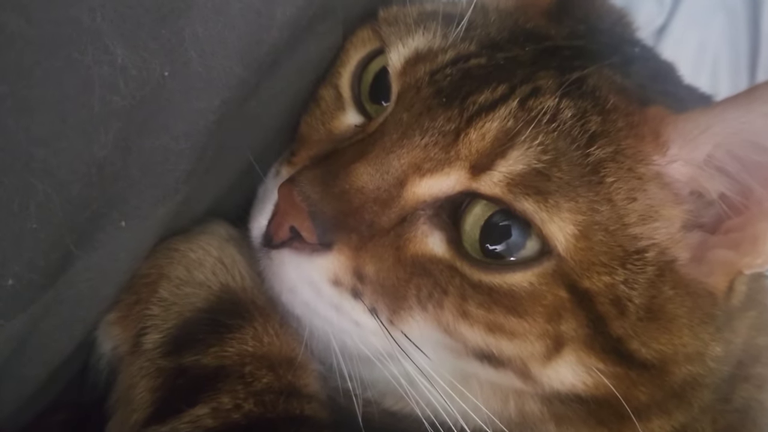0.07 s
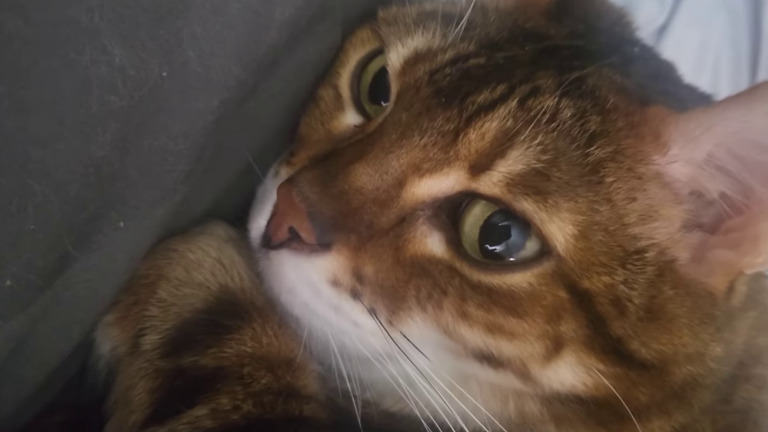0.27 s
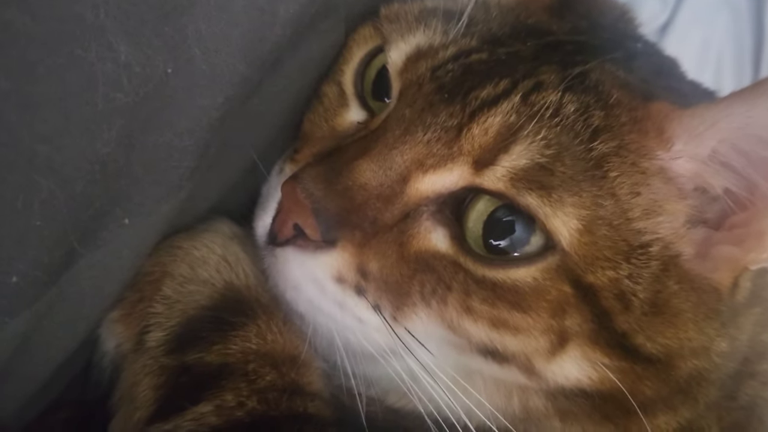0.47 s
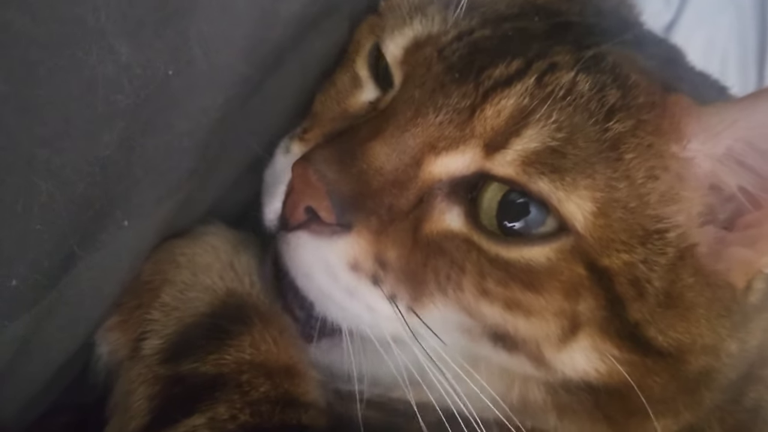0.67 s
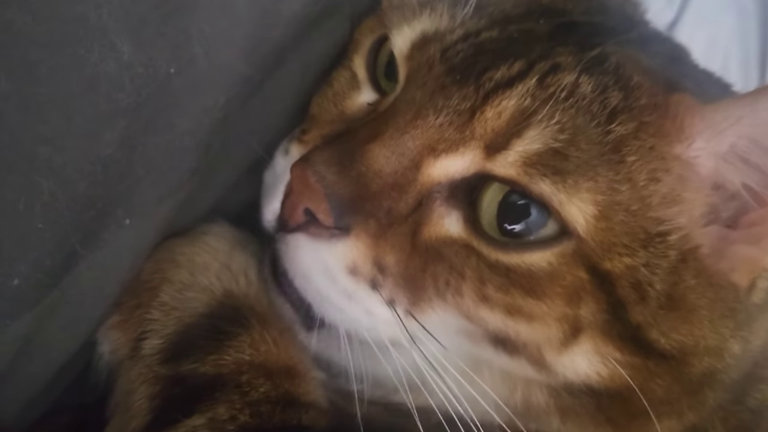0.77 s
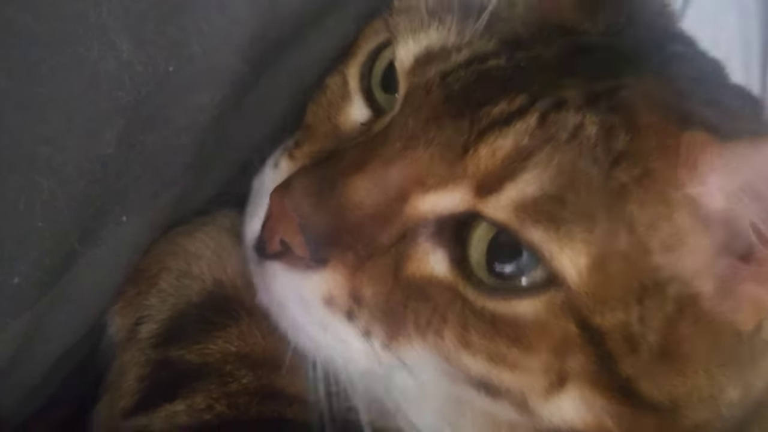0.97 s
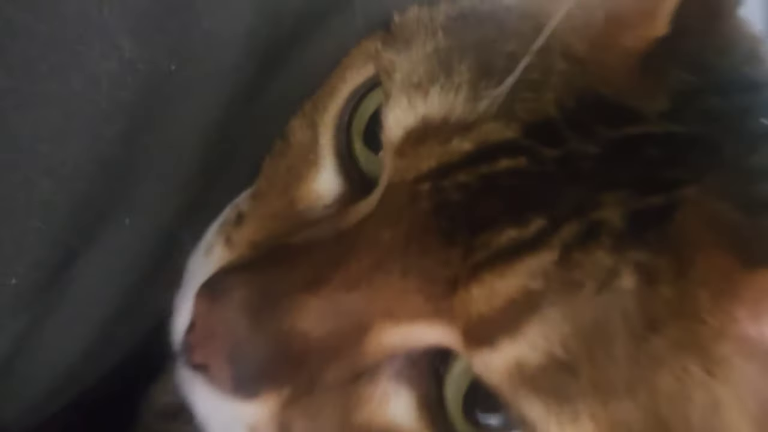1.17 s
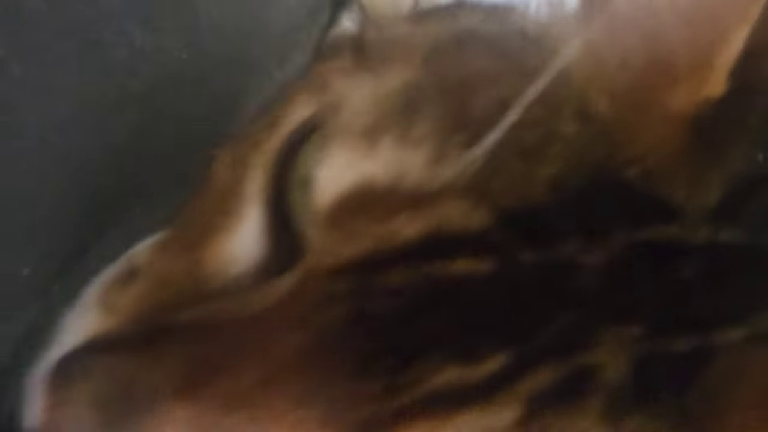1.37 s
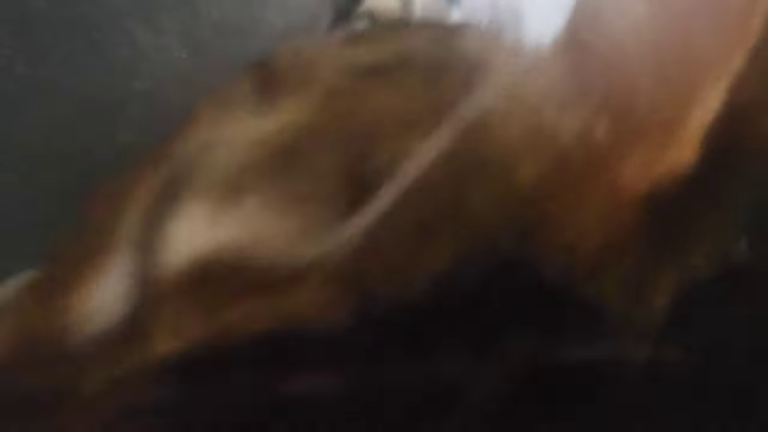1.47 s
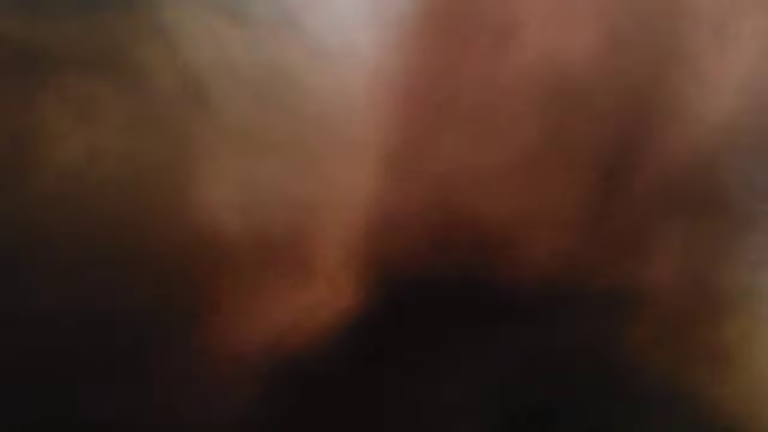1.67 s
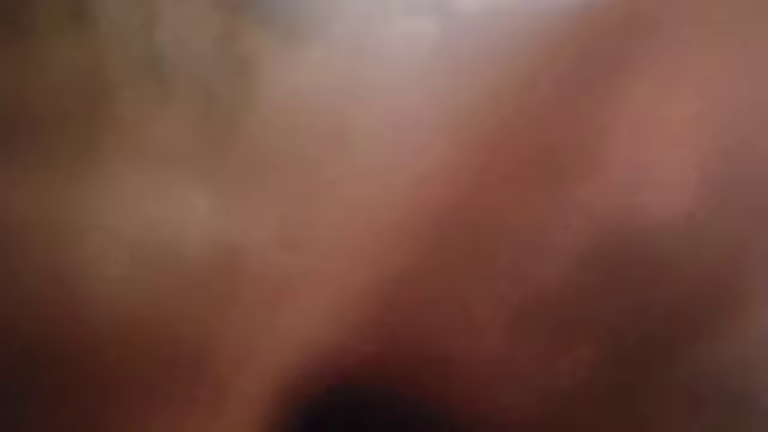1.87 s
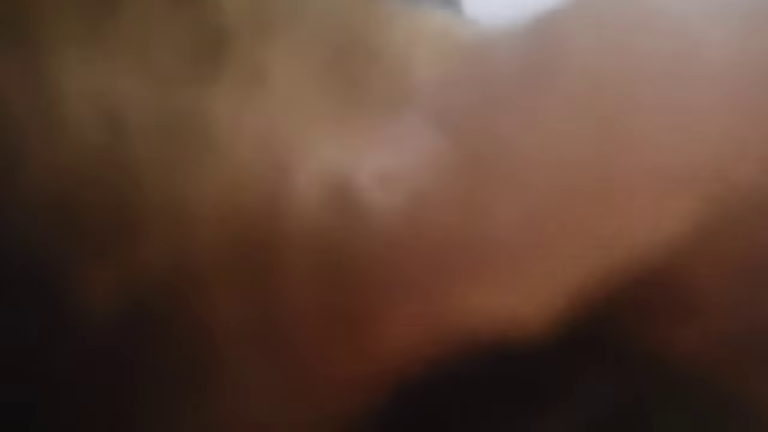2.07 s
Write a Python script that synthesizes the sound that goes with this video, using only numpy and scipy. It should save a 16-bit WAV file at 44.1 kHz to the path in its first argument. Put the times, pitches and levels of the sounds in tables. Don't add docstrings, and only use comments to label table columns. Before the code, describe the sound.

One close cat meow rises and falls with throaty catches; faint chirp before, dull knocks after.

```python
import sys
import numpy as np
from scipy import signal
from scipy.fft import rfft, irfft, next_fast_len
from scipy.io import wavfile
from scipy.ndimage import uniform_filter1d, map_coordinates

SR = 44100
rng = np.random.default_rng(int(sys.argv[2]) if len(sys.argv) > 2 else 0)


def decibels_to_gain(level_db):
    exponent = np.asarray(level_db, float) / 20
    return 10 ** exponent


def wav_out(sig):
    wavfile.write(sys.argv[1], SR, np.round(np.clip(np.atleast_2d(sig).T, -1, 1) * 32767).astype(np.int16))


N = 92830

# t/s, pitch f/Hz, level/dB
MEOW = [
    [(.643, 513, -56), (.66, 468.3, -42), (.674, 517, -36.5), (.688, 451.7, -32), (.706, 488.3, -31.5),
     (.76, 547, -26.5), (.8, 555.3, -26), (.852, 560.9, -27), (.8645, 538.2, -31)],
    [(.8685, 547.7, -22), (.888, 528.3, -24), (.91, 493, -25), (.936, 480.3, -30), (.966, 458.8, -28),
     (.985, 442.8, -31), (1.018, 401.7, -38), (1.042, 386.8, -37.5)],
    [(1.047, 413.5, -39), (1.058, 404.3, -36), (1.088, 374.8, -36.5), (1.112, 366.6, -41.5),
     (1.119, 346.5, -45.5), (1.125, 322.4, -41), (1.136, 315, -64), (1.142, 310, -84)],
]
# t/s, first resonance f/Hz, second resonance f/Hz, second resonance level/dB, brightness level/dB
MOUTH = [
    [(.645, 565, 1280, -30, -49), (.668, 820, 1885, -33.5, -54), (.685, 965, 2280, -13, -32),
     (.715, 1194, 2344, -2, -25), (.76, 1170, 2265, 7.5, -16), (.79, 1165, 2180, 8.5, -15.5),
     (.83, 1240, 1792, 6.5, -20), (.852, 1110, 1920, -4, -27), (.864, 1050, 2106, -10.5, -28.5)],
    [(.869, 1110, 2052, -9.5, -39), (.9, 1000, 2610, -19.5, -55.5), (.932, 935, 2475, -35.5, -64),
     (.968, 920, 1750, -18.5, -65.5), (1.02, 800, 1277, -17, -68), (1.06, 444, 1370, -24.5, -54),
     (1.108, 439, 1347, -13, -57), (1.125, 410, 1000, -18, -64)],
]
# f/Hz, level/dB
UPPER_VOICE = [(1500, 20.5), (3300, -5), (4500, -4), (6200, -8.5), (7800, -4), (8700, -46)]
JITTER, SHIMMER_DB, BREATH_DB = .0015, .4, -37
FIRM_VOICE_DB, ROUGH_DB_PER_WEAK_DB = -21, 0.77
MOUTH1_WIDTH_HZ, MOUTH2_WIDTH_HZ = 240, 840
CHEST_DB, CHEST_HZ, CHEST_WIDTH_HZ = -9.5, 450, 770
VOICE_CLOSES_AT = 0.96
# t/s, level/dB
RASP = [(.655, -85), (.676, -61), (.69, -68), (.71, -65), (.84, -56.5), (.87, -57), (.89, -72),
        (.97, -82.5)]
# f/Hz, level/dB
RASP_COLOUR = [(2500, -3), (5500, -5.5), (6600, -16), (7700, -2), (8300, -6.5), (8700, -42.5), (15000, -42)]
# t/s, length/s, level/dB, f/Hz, width/Hz
WHEEZE = [
    (.692, .03, -57.5, 5550, 500),
    (.68, .014, -69, 7500, 900),
    (.745, 0.039, -63.5, 7400, 600),
    (.853, 0.017, -62, 5500, 1500),
    (.888, 0.055, -55, 7770, 500),
    (.93, 0.079, -74, 7770, 500),
    (1.126, 0.032, -54.5, 853, 500),
    (1.136, 0.0057, -49.5, 397.6, 300),
]
# t/s, length/s, level/dB, f/Hz, width/Hz
TEETH = [
    (.7, .06, -76, 9300, 700),
    (.815, .05, -76, 9500, 200),
    (.875, .07, -71, 9200, 900),
    (.73, .12, -77, 11200, 500),
    (.87, .08, -74, 11200, 600),
    (.8, .2, -77, 15000, 400),
    (.875, .05, -73, 15000, 700),
]
# t/s, peak level/dB, f/Hz, ring/cycles
CLICKS = [(.6645, -31.5, 2900, 18), (.6625, -55, 5200, 37), (.6665, -41, 2960, 17),
          (.675, -19.5, 3400, 11.3), (.6785, -45.5, 3190, 8), (.6845, -40, 4020, 11),
          (.8565, -44, 3300, 14), (.8679, -14.5, 1215, 10), (.8681, -25.5, 2560, 30),
          (.8683, -32.5, 4800, 11), (1.0437, -49, 2400, 16), (1.044, -62, 6500, 9.8),
          (1.0445, -33.5, 900, 24), (1.124, -52, 904, 9.7)]
# t/s, peak level/dB, f/Hz, ring/cycles
TICKS = [
    (.0285, -56, 7400, 20),
    (.0315, -52, 6100, 25),
    (.0405, -53, 10300, 20),
    (.0455, -47, 9500, 8),
    (.0575, -51, 12300, 16),
    (.0745, -50, 7500, 9),
    (.0747, -49, 11800, 12),
]
# t/s, pitch f/Hz, level/dB
CHIRP = [(0.136, 1606, -57), (0.151, 1673, -50), (0.162, 1675, -32.5), (0.168, 1720, -35),
         (0.179, 1723, -32), (.194, 1735, -39), (0.212, 1728, -34.5), (.227, 1773, -39.5),
         (0.239, 1790, -75)]
# t/s, low resonance level/dB, whistle resonance level/dB,
# high resonance f/Hz, high resonance level/dB
AIR = [(.10, -105.5, -82.5, 2450, -83), (.15, -61, -58.5, 2430, -67), (.197, -48, -41.5, 2450, -62),
       (.235, -65.5, -55.5, 2580, -65.5), (.265, -58, -59.5, 2468, -59.5), (.295, -65, -65.5, 2590, -62.5),
       (.35, -90, -72, 2687, -68.5), (.40, -78, -85, 2960, -81), (.44, -105, -112, 3100, -81)]
AIR_END_S, AIR_LOW_HZ, AIR_MID_HZ = 0.452, 1155, 1692
AIR_WIDTH_HZ = [150, 180, 300]
# t/s, length/s, level/dB, f/Hz, width/Hz
SIGHS = [
    (0.436, 0.044, -73, 3280, 720),
    (.29, 0.15, -83.5, 3850, 460),
]
# f/Hz, left over right level/dB
CAT_SIDE = [(200, 6), (600, 3.5), (1290, 4), (2380, 10), (4400, 5.5), (8100, -1.5)]
# f/Hz, left lead t/s
CAT_LEAD = [(500, 0.00026), (1100, 0.00017), (2300, 0.00014), (8000, 0.00016)]
CHIRP_LEAD_S, CHIRP_PAN_DB = -0.00007, -0.5
# t/s, peak level/dB, f/Hz, length/s, scuff level/dB
BUMPS = [
    (1.473, -62.5, 900, 0.0031, 2),
    (1.782, -51, 342, 0.019, -1.5),
    (1.901, -54.5, 240, 0.007, -5),
    (1.9268, -42.5, 425, 0.0072, -19.5),
    (1.9307, -31, 295, 0.011, -17),
    (1.939, -41, 411, 0.01, -11),
    (1.958, -45.5, 265, 0.0045, -12),
    (1.963, -52, 280, 0.01, -5),
    (1.996, -54.5, 272, 0.0068, -20),
]
# f/Hz, width/Hz, level/dB
SHELL = [(546, 340, 4), (1000, 270, -14), (2218, 86, -11.5)]
# t/s, length/s, level/dB, f/Hz, width/Hz
FUR = [
    (1.43, 0.14, -87, 7030, 910),
    (1.7, .2, -85.5, 6940, 900),
    (1.79, 0.014, -64.5, 2233, 250),
    (1.787, .012, -65.5, 1400, 202),
    (1.934, 0.03, -73.5, 4230, 503),
    (1.934, 0.024, -81, 7500, 500),
    (2.033, .046, -84.5, 6600, 900),
    (2.033, .04, -78.5, 11370, 900),
]
WALLS_T60_S, WALLS_DB = .22, -25
# f/Hz, level/dB per Hz
ROOM = [(44, -31), (75, -8), (367, -5.5), (486, -10), (572, -12), (1330, -18.5), (2600, -35), (3380, -69.5),
        (5720, -120)]
# t/s, level/dB
ROOM_SWELL = [(0, -1.5), (.6, -2), (1.2, 0.5), (2.1, -1.5)]
# f/Hz, correlation
ALIKE = [(60, 0.63), (300, .85), (1650, 0), (5000, 0.029)]
# f/Hz, level/dB, width/Hz
HUM = [(238.7, -70.5, 3)]
# t/s, level/dB
MOTOR = [(.3, -64.5), (.7, -72), (2.1, -83.5)]
MOTOR_HZ, ROOM_DB, HISS_DB = 111, -63, -81
# f/Hz, level/dB per Hz
HISS = [(1290, -37.5), (2200, 3.5), (5230, -1), (6640, 3.5), (8620, 0), (11400, 2.5), (12300, -3),
        (15500, -3.5)]
# t/s, level/dB
DUCK = [(.66, -2), (.7, -13.5), (.86, -13.5), (.92, -0.5), (1.12, 4), (1.16, -0.5)]
# t/s, level/dB
HAND = [(0, -67), (.07, -57), (.24, -53), (.29, -64), (.52, -72), (.55, -61), (.66, -55.5), (.75, -68.5),
        (1.0, -63), (1.18, -58.5), (1.27, -74.5), (1.32, -64.5), (1.5, -62), (1.65, -70.5), (2.1, -69)]
# f/Hz, level/dB per Hz
TREMOR = [(15, -14.5), (43, 17.5), (62, 13), (100, -39)]


def meow():
    rows = sum(MEOW, [])
    overtone = np.arange(1, 31)[:, None]
    use = gate(rows[0][0], rows[-1][0], .001) > 0
    first, second, second_db, bright_db = [c[use] for c in curves(sum(MOUTH, []))]
    pitch, level_db = [c[use] for c in curves(rows)]
    weak_db = ROUGH_DB_PER_WEAK_DB * np.maximum(FIRM_VOICE_DB - level_db, 0)
    pitch = pitch * (1 + JITTER * decibels_to_gain(weak_db) * wobble(150)[use])
    f = overtone * pitch
    phase = 2 * np.pi * np.cumsum(pitch) / SR

    one, two = peak(f, first, MOUTH1_WIDTH_HZ), peak(f, second, MOUTH2_WIDTH_HZ)
    low = decibels_to_gain(2 * CHEST_DB) * abs(peak(f, CHEST_HZ, CHEST_WIDTH_HZ)) ** 4
    low = low + abs(one) ** 4 + decibels_to_gain(2 * second_db) * abs(two) ** 4
    low = low / (1 + (f / (VOICE_CLOSES_AT * second)) ** 10)
    flicker_db = 4.5 * np.array([wobble(25)[use] for _ in overtone])
    high = decibels_to_gain(bright_db + along(UPPER_VOICE, f) - weak_db + flicker_db) * (f < 8800)
    mouth_phase = np.angle(two) + np.angle(-1j * one) / 2
    waves = np.sqrt(low + high ** 2) * -np.sin(overtone * phase + mouth_phase)
    tone = np.sum(waves, 0) / np.sqrt(low.sum(0) / 2)

    breath = filtered(rng.standard_normal(N), lambda hz: peak(hz, 1000, 2000) ** 3 / (1 + (hz / 2000) ** 4))
    breath = decibels_to_gain(BREATH_DB + weak_db) * (1 + np.cos(phase)) * unit(breath)[use]
    voice = np.zeros(N)
    voice[use] = decibels_to_gain(level_db + SHIMMER_DB * wobble(91.1)[use]) * (tone + breath)

    rasp_air = filtered(rng.standard_normal((2, N)), lambda hz: decibels_to_gain(along(RASP_COLOUR, hz)) * (hz > 2500))
    rasp = np.zeros(N)
    rasp[use] = decibels_to_gain(curves(RASP)[0][use] + 0.63 * wobble(110)[use]) * (1 + .6 * np.cos(phase))
    return voice, rasp * unit(rasp_air)


def clicks(rows):
    out, t = np.zeros(N), np.arange(SR // 50) / SR
    for s, db, hz, cycles in rows:
        crack = .25 * decibels_to_gain(-60 * t / .002) * uniform_filter1d(rng.standard_normal(len(t)), size=8)
        decay = decibels_to_gain(-60 * t * hz / max(cycles, 2))
        ring = decay * (1 - np.exp(-t * hz)) * np.sin(2 * np.pi * hz * t)
        out[round(s * SR):][:len(t)] += decibels_to_gain(db) * (ring + crack)
    return out


def puffs(rows):
    out, t = np.zeros(N), np.arange(N) / SR
    for s, length, db, hz, width in rows:
        out += decibels_to_gain(db) * np.exp(-4 * ((t - s) / length) ** 2) * band(hz * t, width)
    return out


def chirp():
    pitch, level_db = curves(CHIRP)
    phase = 2 * np.pi * np.cumsum(pitch * (1 + 0.0028 * wobble(216))) / SR
    tone = np.sqrt(2) * decibels_to_gain(level_db + 0.53 * wobble(161.6)) * np.sin(phase)
    tone = gate(CHIRP[0][0], CHIRP[-1][0], 0.004) * tone
    low_db, mid_db, high_hz, high_db = curves(AIR)
    t = np.arange(N) / SR
    turns = [AIR_LOW_HZ * t, AIR_MID_HZ * t, np.cumsum(high_hz) / SR]
    levels = [low_db, mid_db, high_db]
    air = sum(decibels_to_gain(db) * band(u, width) for db, u, width in zip(levels, turns, AIR_WIDTH_HZ))
    return tone + gate(AIR[0][0], AIR_END_S, 0.016) * air + puffs(SIGHS)


def bumps():
    def shell(f):
        return sum((-1) ** k * decibels_to_gain(db) * peak(f, c, w) ** 2 for k, (c, w, db) in enumerate(SHELL))

    out, t = np.zeros(N), np.arange(N) / SR
    scuff = unit(filtered(rng.standard_normal(N), shell))
    for s, db, hz, length, scuff_db in BUMPS:
        u = np.maximum(t - s, 0) / length
        swell = (3 * u) ** 2 * np.exp(2 - 6 * u)
        thump = np.sin(2 * np.pi * hz * (t - s) * (1 + 0.056 * u))
        out += decibels_to_gain(db) * swell * (thump + decibels_to_gain(scuff_db) * scuff)
    return out + puffs(FUR)


def walls(x):
    t = np.arange(SR // 3) / SR
    tail = rng.standard_normal((2, len(t))) * decibels_to_gain(-60 * t / WALLS_T60_S)
    late = np.pad(x, (300, 0))[None]
    wet = signal.fftconvolve(late, tail / np.linalg.norm(tail[0]), axes=1)[:, :N]
    return filtered(wet, lambda hz: 1 / (1 + hz / 3000))


def house():
    t = np.arange(N) / SR
    hum = sum(decibels_to_gain(db) * band(hz * t, width) for hz, db, width in HUM)
    motor = decibels_to_gain(curves(MOTOR)[0]) * band(MOTOR_HZ * t, 8)
    hand = decibels_to_gain(curves(HAND)[0] + 0.94 * wobble(29)) * rush(TREMOR, [(40, 0.88)])
    room_db = ROOM_DB + curves(ROOM_SWELL)[0] + .6 * wobble(4) + 1.5 * wobble(30)
    room = decibels_to_gain(room_db) * rush(ROOM, ALIKE)
    hiss = decibels_to_gain(HISS_DB + curves(DUCK)[0]) * rush(HISS, ALIKE)
    return hum + motor + hand + room + hiss


def unit(x):
    return x / np.sqrt(np.mean(x ** 2) + 1e-20)


def along(points, hz):
    f, v = np.transpose(points)
    return np.interp(np.log(hz + 1), np.log(f + 1), v)


def curves(rows):
    s, *cols = np.transpose(rows)
    return [np.interp(np.arange(N) / SR, s, c) for c in cols]


def gate(start_s, end_s, edge_s):
    t = np.arange(N) / SR
    return np.clip(np.minimum(t - start_s, end_s - t) / edge_s + 1, 0, 1)


def wobble(rate):
    knots = rng.standard_normal(int(N * rate / SR) + 4)
    return map_coordinates(knots, [np.arange(N) * rate / SR])


def filtered(x, response):
    m = next_fast_len(N + SR // 2)
    return irfft(rfft(x, m) * response(np.fft.rfftfreq(m, 1 / SR)), m)[..., :N]


def peak(f, centre, width):
    return 1j * f * width / (centre ** 2 - f * f + 1j * f * width)


def band(turns, width_hz):
    z = filtered(rng.standard_normal((2, N)), lambda hz: 1 / (1 + (2 * hz / width_hz) ** 2))
    envelope = (z[0] + 1j * z[1]) / np.sqrt(np.mean(z ** 2))
    return np.real(envelope * np.exp(2j * np.pi * turns))


def rush(spectrum, alike):
    def response(hz):
        turn = np.arccos(np.clip(along(alike, hz), -1, 1)) / 2
        return decibels_to_gain(along(spectrum, hz)) * [np.cos(turn), np.sin(turn)]

    mid, side = filtered(rng.standard_normal((2, N)), response)
    return np.array([mid + side, mid - side]) / np.sqrt(np.mean(mid ** 2) + 1e-30)


def placed(x, lead, balance):
    sign = np.array([[1], [-1]])

    def response(hz):
        gain = decibels_to_gain(sign * along(balance, hz) / 2)
        return gain * np.exp(1j * np.pi * hz * along(lead, hz) * sign)

    return filtered(x[None], response)


def scene():
    voice, rasp = meow()
    thin = chirp()
    near = voice + clicks(CLICKS) + puffs(WHEEZE)
    teeth = np.array([decibels_to_gain(3.0) * puffs(TEETH), decibels_to_gain(1.5) * puffs(TEETH)])
    cat = placed(near, CAT_LEAD, CAT_SIDE) + rasp + teeth + clicks(TICKS)
    whistle = placed(thin, [(1, CHIRP_LEAD_S)], [(1, CHIRP_PAN_DB)])
    knocks = placed(bumps(), [(1, -.00015)], [(1, -1.8)])
    return cat + whistle + knocks + decibels_to_gain(WALLS_DB) * walls(near + thin) + house()


def low_pass(x):
    return signal.sosfilt(signal.butter(12, 15680, fs=SR, output="sos"), x)


def record(dry):
    return low_pass(dry)


dry = scene()
out = record(dry)
wav_out(out)
```